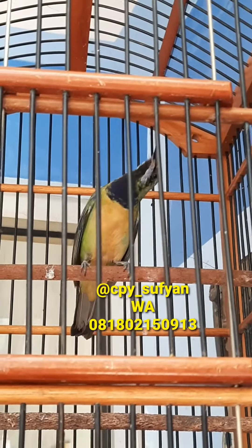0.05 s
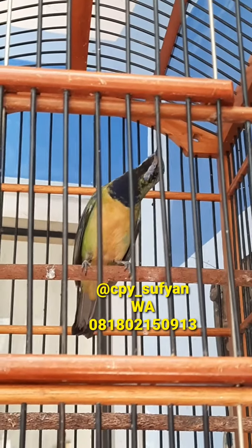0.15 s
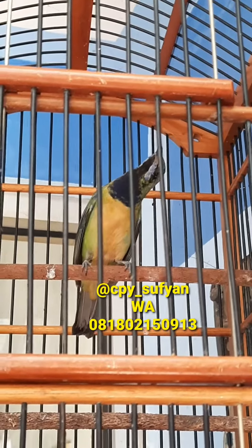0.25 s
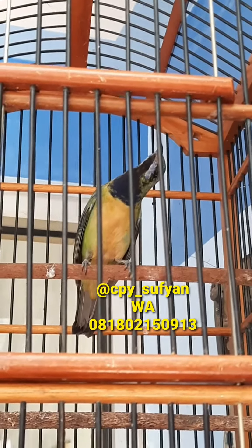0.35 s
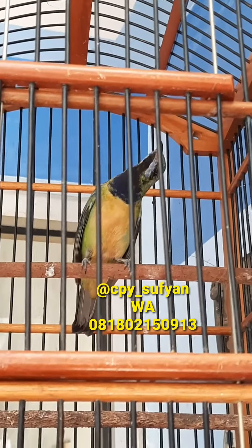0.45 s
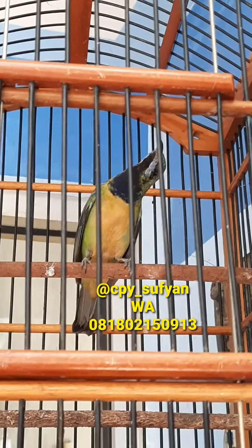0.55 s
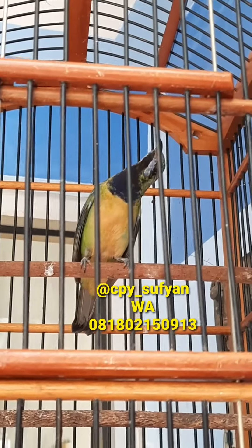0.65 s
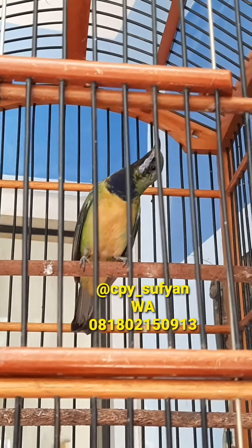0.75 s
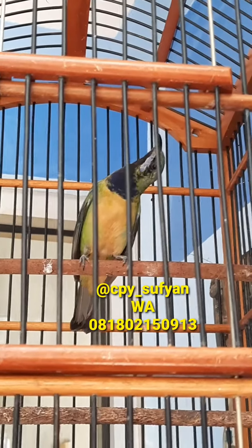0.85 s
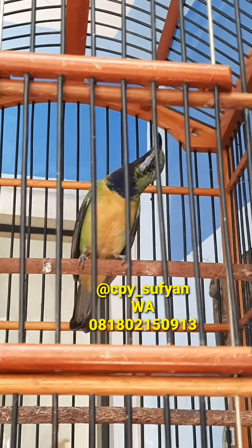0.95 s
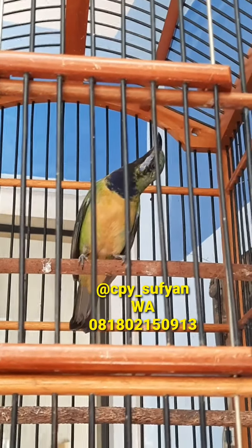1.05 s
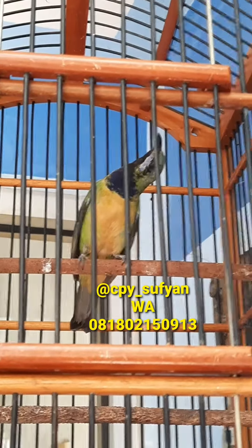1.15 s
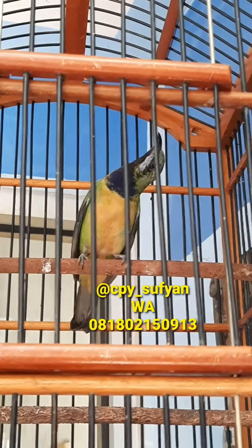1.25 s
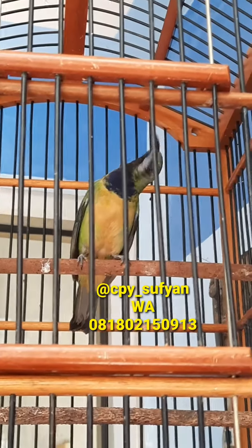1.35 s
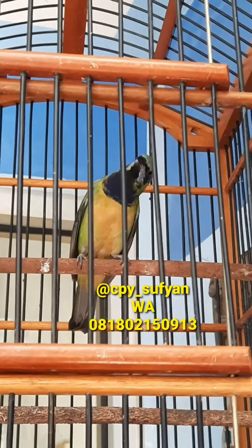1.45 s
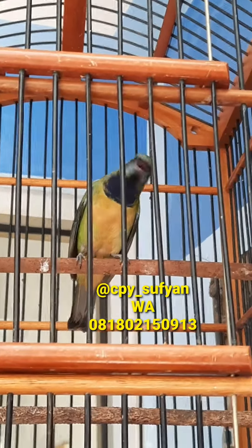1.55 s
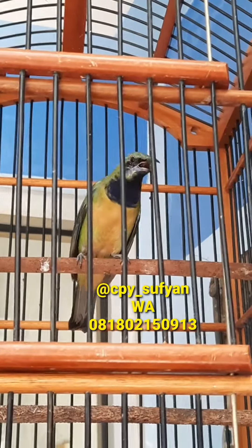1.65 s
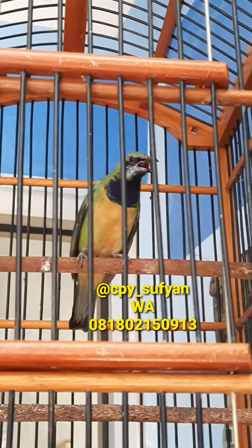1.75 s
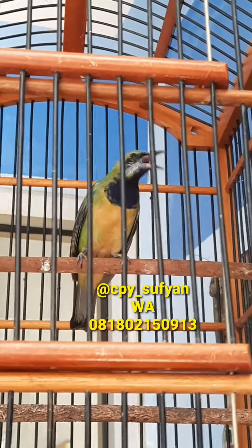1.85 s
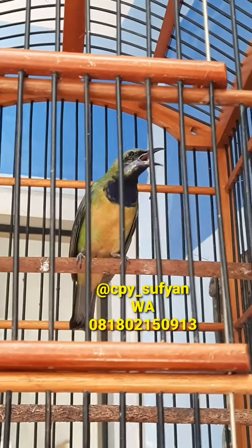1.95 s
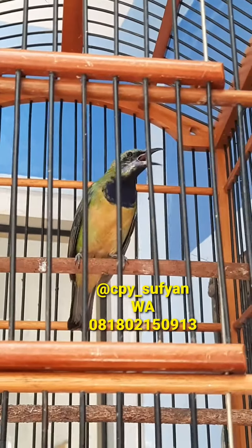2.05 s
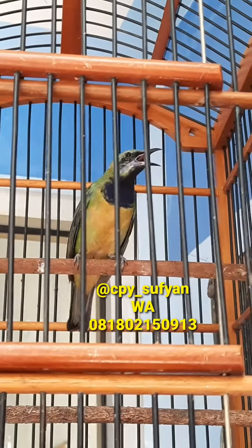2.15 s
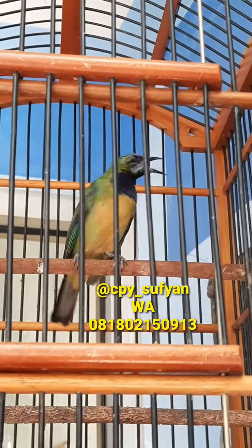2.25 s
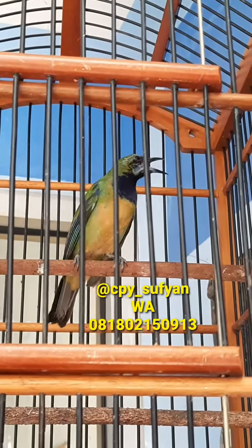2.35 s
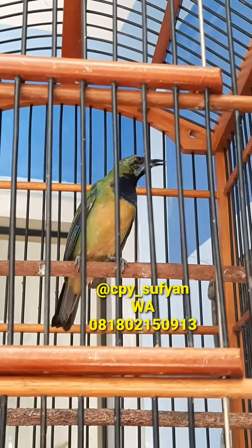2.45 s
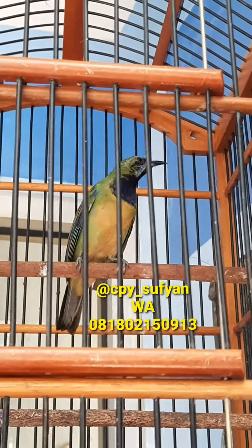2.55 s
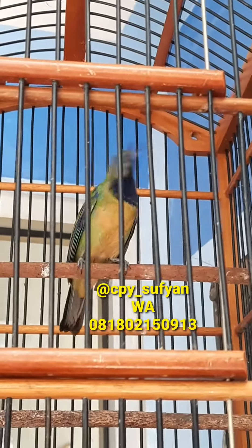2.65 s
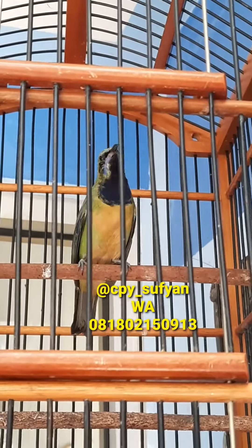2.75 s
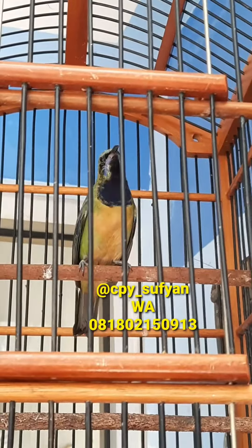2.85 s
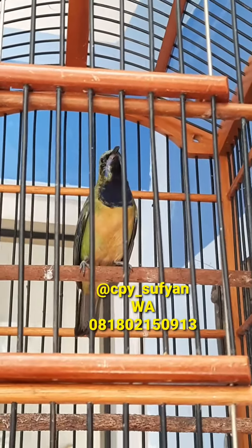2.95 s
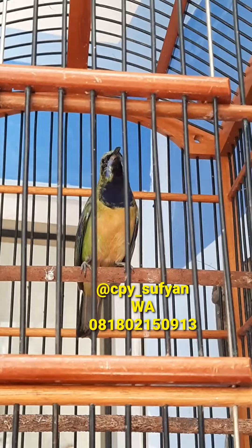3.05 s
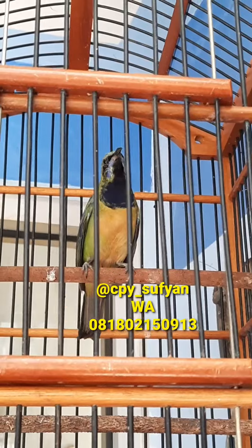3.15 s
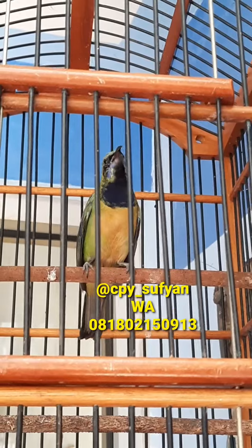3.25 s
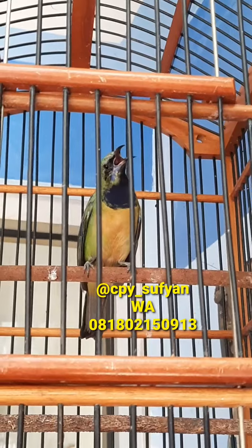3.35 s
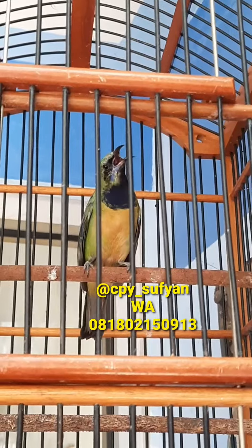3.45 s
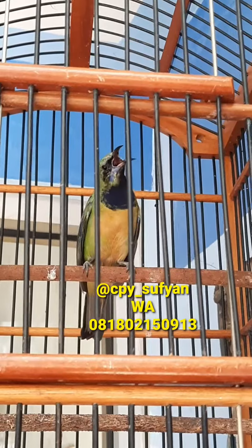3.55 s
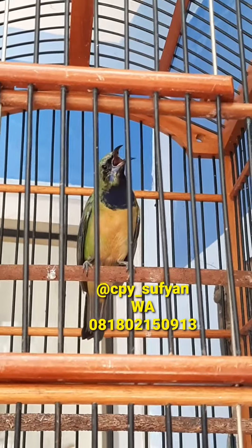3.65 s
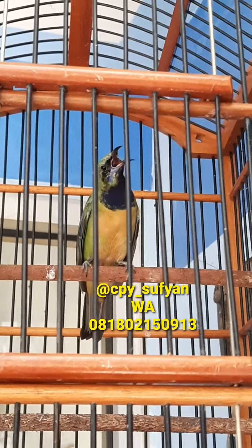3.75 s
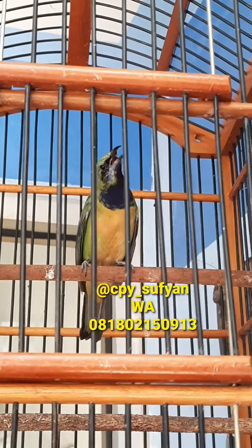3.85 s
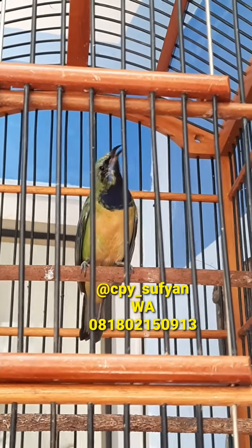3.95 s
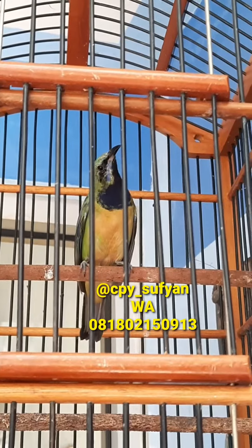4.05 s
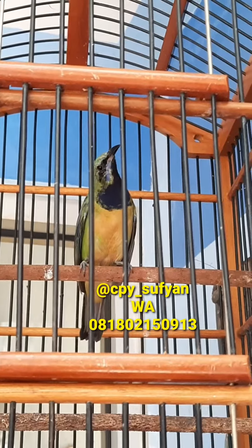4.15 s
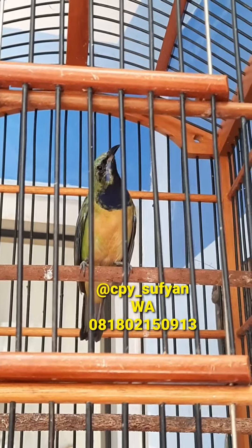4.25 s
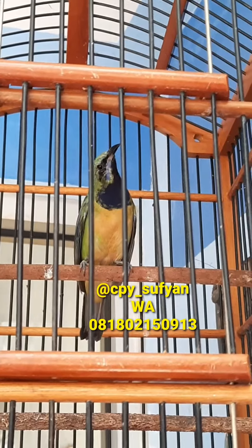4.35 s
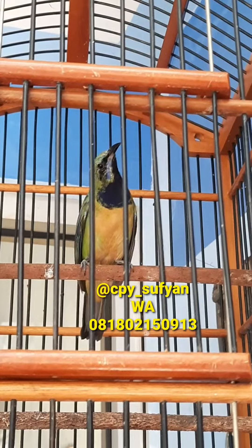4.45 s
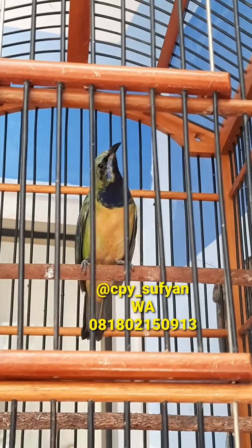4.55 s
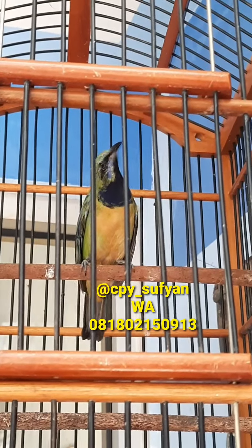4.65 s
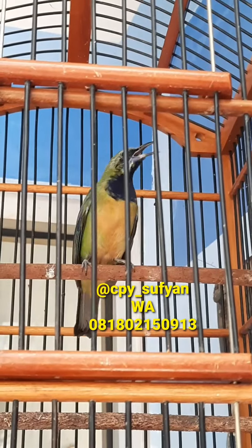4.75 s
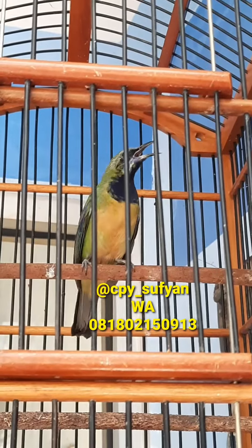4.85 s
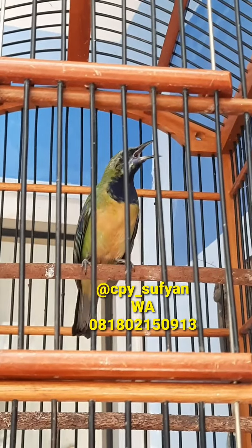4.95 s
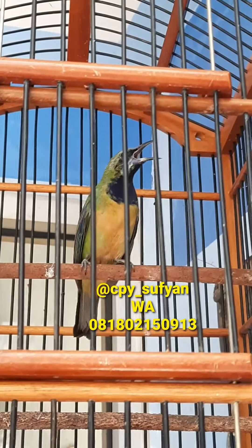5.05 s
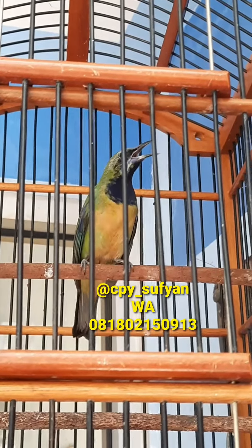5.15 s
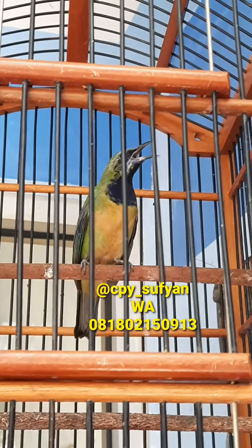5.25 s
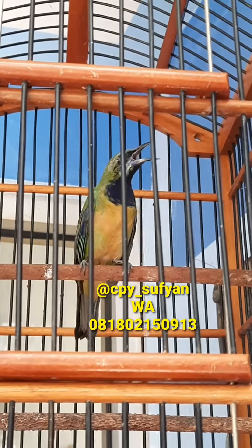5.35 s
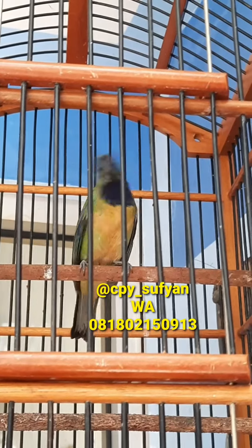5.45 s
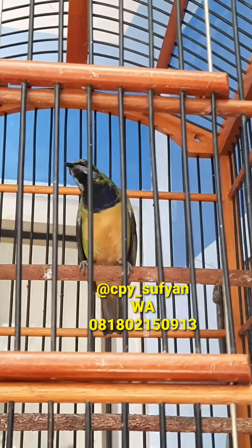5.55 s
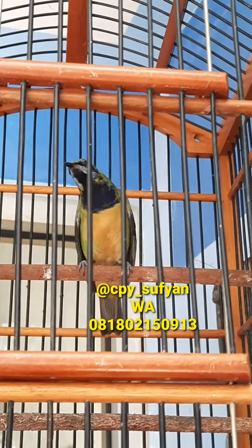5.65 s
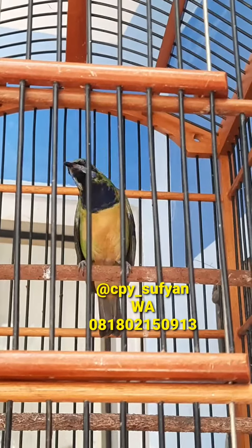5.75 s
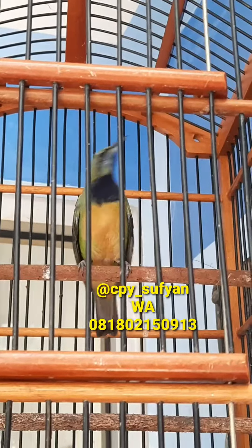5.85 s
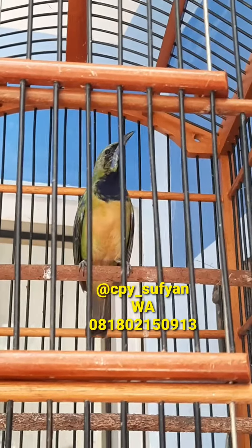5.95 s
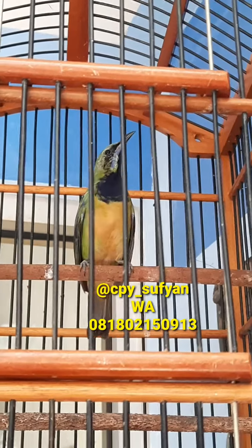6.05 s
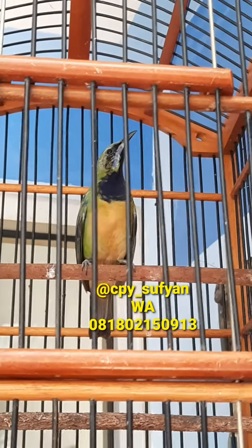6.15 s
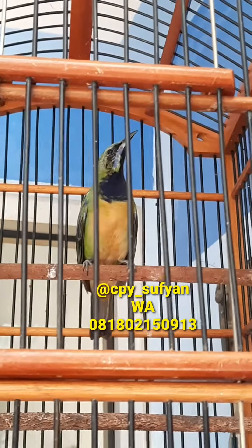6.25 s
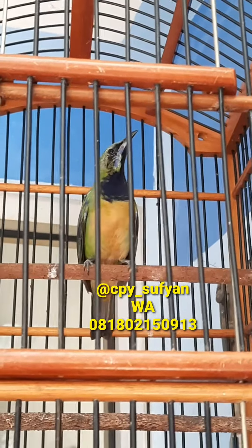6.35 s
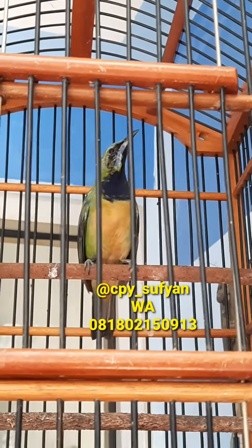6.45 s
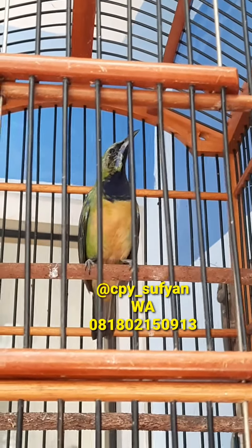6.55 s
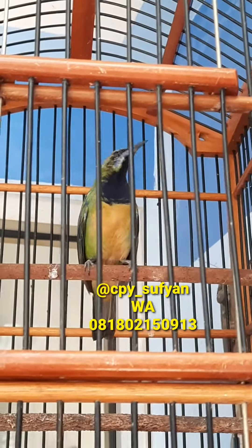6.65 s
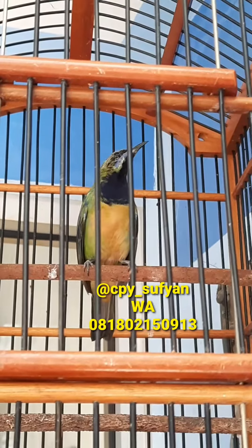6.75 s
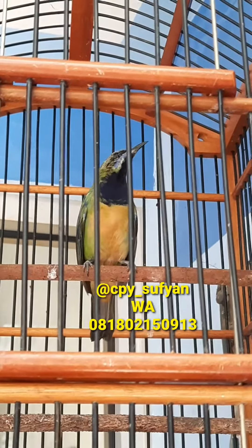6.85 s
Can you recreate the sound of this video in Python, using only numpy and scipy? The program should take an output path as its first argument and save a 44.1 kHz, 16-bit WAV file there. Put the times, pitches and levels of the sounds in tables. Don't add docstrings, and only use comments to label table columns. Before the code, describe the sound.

In a small hard-walled yard, faint brushing and a thin, hoarse far whistle come first. A low motor swells beyond the wall, then a close caged songbird, slightly left, rattles three rapid runs of dry high rasps. During the third, a second bird on the right begins sharp, squealing chacks about five per second, continuing to the end. Close stereo pickup, short bright echoes.

```python
import sys
import numpy as np
from scipy import signal
from scipy.io import wavfile

SR = 44100
rng = np.random.default_rng(int(sys.argv[2]) if len(sys.argv) > 2 else 0)


def generate_wav(sig):
    pcm = np.round(np.clip(np.atleast_2d(sig).T, -1, 1) * 32767).astype(np.int16)
    wavfile.write(sys.argv[1], SR, pcm)


def gain_from_db(level_db):
    decades = np.asarray(level_db, float) / 20
    return 10 ** decades


N = 303849

YARD_T60_S, BARS_T60_S = 0.46, 0.036

RUN_STARTS = [1.62, 3.33, 4.82]
# [t/s, level/dB, length/ms, throat f/Hz]
RASP_NOTES = [(1.624, -17.5, 25, 6000), (1.688, -18.5, 31, 5500), (1.766, -15.5, 30.4, 4860),
              (1.845, -14.5, 31.2, 4960), (1.909, -15, 40.6, 5540), (2.014, -14, 33, 5530),
              (2.094, -15.5, 33.2, 5280), (2.173, -16.5, 33, 5340), (2.244, -16, 40.2, 5500),
              (2.315, -14, 22.7, 5830), (2.374, -19.5, 23.5, 5980), (2.43, -23.5, 24, 5660),
              (3.335, -23.5, 34, 5500), (3.405, -19, 26.5, 6000), (3.475, -18, 40, 5060),
              (3.569, -16.5, 49, 5160), (3.629, -16.5, 40, 5560), (3.717, -15, 30, 5350),
              (3.799, -15, 26.8, 5600), (3.86, -18, 30, 6000), (4.83, -23, 18.6, 5650),
              (4.894, -23, 30, 6540), (4.972, -15.5, 33, 4970), (5.036, -16.5, 30.4, 5600),
              (5.106, -17.5, 28.6, 6000), (5.179, -19.5, 31, 5500), (5.262, -19.5, 35, 4700),
              (5.332, -19.5, 43, 5700), (5.397, -17.5, 37, 5600)]
LOW_DB, LOW_FADE_DB_PER_S = -10, 11
TOP_DB, TOP_GROWTH = -4.5, 0.21


def rasps():
    out = np.zeros((2, N + SR))
    for s, db, ms, hz in RASP_NOTES:
        into_run_s = min(s - start for start in RUN_STARTS if start < s)
        low_db = LOW_DB - LOW_FADE_DB_PER_S * into_run_s
        top_db = TOP_DB + TOP_GROWTH * (db + 15)
        size = int(1.7 * ms * SR / 1000)
        opening = np.linspace(-.5, .5, size)
        centre_hz = min(hz, 5950)
        pitch_hz = 680 * (1 + .1 * rng.standard_normal() + 0.1567 * opening)
        partials = np.arange(2, 14)[:, None] * pitch_hz
        throat = hump(partials, centre_hz * (1 + 0.34 * opening), 2300)
        throat += gain_from_db(low_db + 5) * hump(partials, 2900, 2400)
        partials_db = 20 * np.log10(throat) - 6 * (partials < 1550) - 5 * (partials > 7600)
        voiced = strands(partials, partials_db, fray_db=4.0, fray_hz=600, wobble_hz=150)
        air = slaps(size, rate_hz=1300, jitter=.5, uneven_db=-5.5, breath=1.5)
        breath = unit(resonate(air, centre_hz, 1670) - gain_from_db(low_db) * resonate(air, 3800, 2900))
        top = gain_from_db(top_db - 8.5) * unit(resonate(air, 17400, 2500) - resonate(air, 11500, 1300))
        note = gain_from_db(db - 8) * swell(size, rise=1.2, fall=1.3) * (voiced + gain_from_db(1.5) * breath - top)
        at = int((s - .25 * ms / 1000) * SR)
        out[:, at:at + size + 1323] += in_cage(note, lag=-4.5, pan_db=4.0, bars_db=2.5)
    return signal.sosfilt(signal.butter(2, 1450, "high", fs=SR, output="sos"), out)


# [t/s, level/dB, length/ms, squeal f/Hz, low resonance level/dB]
CHACK_NOTES = [
    (4.898, -9, 18.3, 6950, -42),
    (5.117, -16, 22, 7260, -32),
    (5.341, -9, 13, 7430, -22.5),
    (5.548, -12, 25.6, 7695, -19.5),
    (5.766, -10.5, 23.1, 7100, -21.5),
    (5.977, -15, 17.2, 7190, -18.5),
    (6.208, -12, 16, 7326, -18.5),
    (6.407, -12, 12.5, 7630, -14.5),
    (6.623, -12, 17.3, 7520, -15),
    (6.836, -15, 16.8, 7510, -13.5),
]
MID_DB, MID_SQUEEZE = -11, 0.51


def chacks():
    out = np.zeros((2, N + SR))
    for s, db, ms, hz, low_db in CHACK_NOTES:
        mid_db = MID_DB - MID_SQUEEZE * (db + 13)
        size = int(2.1 * ms * SR / 1000)
        share = np.linspace(0, 1, size)
        high_hz = hz * np.array([[1], [1.13], [1.28], [1.42], [1.8], [1.93]])
        high_hz = high_hz * (1 + 0.134 * np.exp(-share / 0.069))
        high_db = np.array([[0], [-5], [-14], [-22], [-24], [-22]])
        squeal = strands(high_hz, high_db, fray_db=2.5, fray_hz=700, wobble_hz=236)
        mid_hz = hz * np.array([[.84], [.72]]) * (1.04 - .1 * share)
        mid = strands(mid_hz, np.array([[0], [-3]]), fray_db=5.0, fray_hz=800, wobble_hz=350)
        low_hz = hz * np.array([[.42], [.31], [.2]]) * (1.1 - 0.38 * share)
        low = strands(low_hz, np.array([[0], [-1], [-9]]), fray_db=5.5, fray_hz=426, wobble_hz=211)
        air = slaps(size, rate_hz=920, jitter=0.35, uneven_db=9.0, breath=0.99)
        stutter = gain_from_db(2.7 * quiver((1, size), 350)[0])
        hiss = gain_from_db(-12) * unit(resonate(air, hz, 3500)) + gain_from_db(-18) * unit(resonate(air, 13600, 2500))
        note = swell(size, rise=1.0, fall=1.78) * (stutter * squeal + hiss)
        note += swell(size, rise=1.3, fall=2.0) * gain_from_db(mid_db + 7) * mid
        note += swell(size, rise=1.9, fall=1.48) * gain_from_db(low_db + 6.5) * low
        note[:300] += gain_from_db(4) * ping()
        puff = unit(resonate(resonate(air, 600, 900), 600, 900))
        note += gain_from_db(low_db - 8) * swell(size, rise=2.4, fall=3.0) * puff
        at = int((s - .005) * SR)
        out[:, at:at + size + 1323] += in_cage(gain_from_db(db - 8) * note, lag=13, pan_db=-11, bars_db=-9)
    return out


def ping():
    click = signal.unit_impulse(300)
    return resonate(resonate(click, 9000, 900), 8400, 900) + gain_from_db(-22) * resonate(click, 13500, 2500)


# [t/s, peak level/dB]
BEAK_TICKS = [(5.7542, -32), (5.9585, -25), (6.1774, -29), (6.388, -35), (6.6075, -24), (6.822, -31)]


def ticks():
    out = np.zeros((2, N + SR))
    for s, db in BEAK_TICKS:
        at = int(s * SR)
        out[:, at:at + 1623] += in_cage(gain_from_db(db + 29) * ping(), lag=13, pan_db=-9, bars_db=-15)
    return out


# [t/s, length/s, top f/Hz, level/dB]
ARCHED_WHISTLES = [
    (0.079, 0.23, 6300, -34.5),
    (1.449, 0.17, 6450, -34.5),
    (2.686, 0.24, 6090, -43),
    (4.016, 0.1244, 6280, -37.5),
    (6.747, 0.182, 5920, -40.5),
]
# [t/s, length/s, first f/Hz, last f/Hz, level/dB]
STRAIGHT_WHISTLES = [(0.614, 0.17, 4605, 4780, -44), (.69, .16, 6760, 7300, -48),
                     (1.02, 0.12, 6670, 5600, -51), (1.376, 0.17, 5500, 5480, -40),
                     (2.294, 0.17, 6300, 6180, -29), (3.867, 0.08, 6760, 6760, -39),
                     (2.827, 0.097, 5660, 4870, -42.5), (3.037, .14, 5730, 4340, -49.5),
                     (3.231, 0.094, 6600, 6770, -56), (4.078, .1, 7000, 6930, -41),
                     (4.13, 0.11, 5950, 5650, -35.5), (6.506, 0.099, 4746, 4820, -40)]
ARCH_DROP, ARCH_TOP_AT = .075, 0.49


def whistles():
    out = np.zeros((2, N + SR))
    flutter = [wander(150) for k in range(4)]
    fray = [wander(60) for k in range(4)]
    share = np.linspace(0, 1, 33)
    arch = 1 - ARCH_DROP * ((share - ARCH_TOP_AT) / (1 - ARCH_TOP_AT)) ** 2
    notes = [(s, length, hz * arch, db, 1.1) for s, length, hz, db in ARCHED_WHISTLES]
    for s, length, first, last, db in STRAIGHT_WHISTLES:
        notes.append((s, length, last + (first - last) * (1 - share) ** 1.5, db, .55))
    for s, length, hz, db, hoarse in notes:
        span = slice(int(s * SR), min(int((s + length) * SR), N))
        shape = swell(int(length * SR) + 2, rise=0.47, fall=0.92)
        t = np.arange(N)[span] / SR - s
        for k in range(4):
            echo = k // 2
            pitch_hz = np.interp(t - 0.01954 * echo, share * length, hz)
            shake = 1 + hoarse * (.008 + .02 * echo) * flutter[k][span]
            turns = np.cumsum(pitch_hz * shake) / SR
            gain = gain_from_db(db - 1.2 * echo + 4.1 * hoarse * fray[k][span])
            out[k % 2, span] += shape[:len(t)] * gain * np.sin(2 * np.pi * turns)
    return out


# [t/s, level/dB, length/ms, f/Hz, width/Hz]
HOARSE_NOTES = [(.001, -40, 310, 3760, 2600), (.05, -48, 113, 630, 111.1), (0.553, -38, 82, 1980, 378),
                (.915, -38, 80, 2050, 540), (1.122, -43.5, 61, 1050, 486), (1.24, -42.5, 46, 3040, 540),
                (1.39, -40.5, 71, 6500, 1944), (1.471, -39.5, 120, 3940, 1620),
                (1.659, -44, 140, 1150, 503), (2.441, -40, 30, 1050, 450), (2.63, -44.5, 110, 5800, 2160),
                (4.1, -54, 120, 2440, 300), (4.561, -49.5, 240, 5200, 900), (4.57, -51, 150, 6700, 900),
                (4.77, -51, 69, 2510, 200), (5.123, -39, 14, 388.9, 555.6), (5.344, -38.5, 11, 590, 800)]


def hoarse_calls():
    out = np.zeros((2, N + SR))
    for s, db, ms, hz, width_hz in HOARSE_NOTES:
        size = int(ms * SR / 1000)
        air = rng.standard_normal((2, 16000))[:, :size]
        breath = unit(resonate(resonate(air, hz, width_hz), hz, width_hz))
        at = int(s * SR)
        out[:, at:at + size] += gain_from_db(db) * swell(size, rise=0.21, fall=0.27) * breath
    return out


# [low f/Hz, high f/Hz]
GROUND_BANDS = [
    (700, 1500),
    (1500, 3200),
    (3200, 6800),
    (7200, 14500),
]
# [t/s, length/s, level/dB, brightness/dB per band step]
BRUSH_STROKES = [(0, 0.43, -41, -2.5), (0.55, .2, -49, -9.5), (0.703, 0.42, -50, 2),
                 (0.882, 0.28, -42, -5.5), (1.132, 0.2, -41.5, -0.5), (1.295, 0.74, -41.5, -2),
                 (1.502, 0.9, -39.5, -0.5), (2.395, 0.51, -45.5, -3), (2.81, 0.26, -47.5, -0.5),
                 (3.06, 0.21, -49, 2), (3.904, 0.53, -49.5, 5.5), (4.415, 0.085, -52, -1.0),
                 (4.55, 0.27, -51.5, 1), (4.81, 0.46, -43, -2), (5.493, 0.51, -44.5, 2),
                 (6.206, 2.6, -48.5, 3)]
STROKE_COLOUR = [-16, -3, -1.5, -9.5]
SHUFFLE = [-58.5, -54.5, -57.5, -72]


def rustle():
    power = np.ones((4, N + 2 * SR)) * gain_from_db(np.array(SHUFFLE)[:, None]) ** 2
    for s, length, db, bright_db in BRUSH_STROKES:
        colour = gain_from_db(db + np.array(STROKE_COLOUR) + bright_db * (np.arange(4) - 2))[:, None]
        at, size = int(s * SR), int(length * SR)
        power[:, at:at + size] += (colour * swell(size, rise=0.36, fall=1.47)) ** 2
    grain = gain_from_db(1.12 * wander(110))
    out = np.zeros((2, N))
    for p, band in zip(power, GROUND_BANDS):
        out += np.sqrt(p[:N]) * gain_from_db(2.9 * wander(2.6)) * grain * stereo_band(*band)
    return out


# [t/s, level/dB]
MOTOR_LEVEL = [(0.0, -40), (0.11, -62), (0.55, -45), (0.94, -53), (1.21, -45), (1.34, -59), (1.4, -35),
               (1.5, -31.5), (1.98, -36.5), (4.39, -37.5), (4.8, -35), (5.12, -40), (6.43, -40.5),
               (6.68, -37.5), (6.89, -40.5)]
# [f/Hz, level/dB per Hz]
MOTOR_SPECTRUM = [(18, -45), (30, -18), (64, 1), (82, -0.5), (129, -4), (200, -22), (260, -51), (440, -120)]


def rumble():
    s, db = np.transpose(MOTOR_LEVEL)
    turns = np.cumsum(80 * (1 + 0.0318 * wander(3.22))) / SR
    firing = np.sin(2 * np.pi * turns) * gain_from_db(-1.5 + 1.0 * wander(14.0))
    body = coloured(MOTOR_SPECTRUM, np.geomspace(45, 200, 6), patchy_db=0.0)
    return gain_from_db(np.interp(np.arange(N) / SR, s, db) - 4.5) * (body + firing)


# [f/Hz, width/Hz, level/dB]
TRAFFIC_MODES = [
    (314, 39, -54.5),
    (367, 39, -58),
    (650, 140, -64),
]


def drone():
    shared, own = rng.standard_normal(N), rng.standard_normal((2, N))
    s, motor_db = np.transpose(MOTOR_LEVEL)
    load_db = 0.31 * np.interp(np.arange(N) / SR, s, np.maximum(motor_db, -50) + 44.5)
    out = np.zeros((2, N))
    for hz, width_hz, db in TRAFFIC_MODES:
        boom = unit(resonate(resonate(shared + 0.5 * own, hz, width_hz), hz, width_hz))
        out += gain_from_db(db + load_db + 2.9 * wander(1.27)) * boom
    return out


# [f/Hz, level/dB per Hz]
AIR_SPECTRUM = [(18, -32), (30, -5.5), (83, -8.5), (237, -23), (324, -0.5), (443, -15), (606, -16),
                (1820, -30.5), (3320, -53), (3880, -25.5), (7460, -36), (14000, -29.5), (15500, -64)]


def open_air():
    return gain_from_db(-51) * coloured(AIR_SPECTRUM, np.geomspace(75, 15500, 15), patchy_db=3.5)


def slaps(size, rate_hz, jitter, uneven_db, breath):
    chance = rng.standard_normal((3, 4096))
    at = np.cumsum(SR / rate_hz * np.exp(jitter * chance[0])).astype(int)
    out = breath * chance[2, :size] * np.sqrt(rate_hz / SR)
    out[at[at < size]] += gain_from_db(uneven_db * chance[1, at < size])
    return unit(out)


def strands(hz, db, fray_db, fray_hz, wobble_hz):
    turns = np.cumsum(hz + wobble_hz * quiver(hz.shape, 118.4), axis=1) / SR + rng.random((len(hz), 1))
    gain = gain_from_db(db + fray_db * quiver(hz.shape, fray_hz))
    return unit(np.sum(gain * np.sin(2 * np.pi * turns), axis=0))


def quiver(shape, rate_hz):
    r = np.exp(-2 * np.pi * rate_hz / SR)
    chance = rng.standard_normal((shape[0], 4600))
    return unit(signal.lfilter([1], [1, -2 * r, r * r], chance)[:, 500:500 + shape[1]])


def wander(rate_hz):
    r = np.exp(-32 * np.pi * rate_hz / SR)
    slow = signal.lfilter([1], [1, -2 * r, r * r], rng.standard_normal(N // 16 + 3002))[3000:]
    return np.interp(np.arange(N) / 16, np.arange(len(slow)), unit(slow))


def swell(size, rise, fall):
    share = np.linspace(0, 1, size)
    shape = share ** rise * (1 - share) ** fall
    return shape / shape.max()


def unit(x):
    return x / np.sqrt(np.mean(x ** 2) + 1e-20)


def resonate(x, hz, width_hz):
    r = np.exp(-np.pi * width_hz / SR)
    poles = [1, -2 * r * np.cos(2 * np.pi * hz / SR), r * r]
    return signal.lfilter(np.array([1, 0, -1]) * (1 - r * r) / 2, poles, x)


def hump(hz, centre_hz, width_hz):
    return 1 / (1 + (2 * (hz - centre_hz) / width_hz) ** 2)


def on_log_hz(points, hz):
    return np.interp(np.log(hz), np.log(np.array(points)[:, 0]), np.array(points)[:, 1])


# [f/Hz, correlation]
EAR_LIKENESS = [(60, 0.91), (180, .85), (550, 0.54), (1300, -0.2), (2000, -0.12), (5000, 0.02)]


def stereo_band(low_hz, high_hz):
    sos = signal.butter(2, [low_hz, high_hz], "band", fs=SR, output="sos")
    mid, side = unit(signal.sosfilt(sos, rng.standard_normal((2, N))))
    alike = np.clip(on_log_hz(EAR_LIKENESS, np.sqrt(low_hz * high_hz)), -1, 1)
    return (np.sqrt(1 + alike) * mid + np.sqrt(1 - alike) * side * np.array([[1], [-1]])) / np.sqrt(2)


def coloured(spectrum, edges_hz, patchy_db):
    out = np.zeros((2, N))
    for a, b in zip(edges_hz, edges_hz[1:]):
        gain = gain_from_db(on_log_hz(spectrum, np.sqrt(a * b)) + patchy_db * wander(4.1))
        out += gain * np.sqrt(b - a) * stereo_band(a, b)
    return unit(out)


def tail(t60, length, size):
    age = np.arange(size) / SR
    cloud = rng.standard_normal((2, size)) * gain_from_db(-60 * age / t60) * (age < length)
    return unit(cloud) / np.sqrt(size)


def in_cage(note, lag, pan_db, bars_db):
    direct = np.pad(note, (16, 1307))
    direct = np.array([np.roll(direct, lag), direct]) * gain_from_db(np.array([[pan_db], [-pan_db]]) / 2)
    return direct + gain_from_db(bars_db) * signal.fftconvolve(note[None], tail(BARS_T60_S, .03, size=1324), axes=1)


def yard(x, wet_db, t60):
    echo = signal.lfilter([1], [1, -.35], tail(t60, .5, size=SR // 2))
    echo = np.pad(echo, ((0, 0), (350, 0)))
    return x[:, :N] + gain_from_db(wet_db) * signal.fftconvolve(x.mean(axis=0)[None], echo, axes=1)[:, :N]


def scene():
    near = yard(rasps(), wet_db=-6.5, t60=YARD_T60_S) + yard(chacks() + ticks(), wet_db=-11.0, t60=0.25)
    far = yard(whistles() + hoarse_calls(), wet_db=-2.0, t60=YARD_T60_S)
    return near + far + rustle() + rumble() + drone() + open_air()


# [t/s, length/s]
LOW_MID_GAPS = [(1.862, .025), (1.912, .04), (2.12, 0.032), (2.19, .025), (2.249, 0.13), (2.385, .045),
                (3.453, .08), (3.59, .09), (3.787, 0.13), (4.949, .04), (5.033, .06), (5.17, .07),
                (5.263, .06), (5.393, .09), (5.783, 0.037)]
GAP_LOW_HZ, GAP_HIGH_HZ, WIDEN_HZ_PER_S = 580, 1150, 3900


def thin_out(x):
    hz, s, frames = signal.stft(x, SR, nperseg=1024)
    loud = np.sqrt(np.mean(np.abs(frames[:, (hz > 3000) & (hz < 8000)]) ** 2, axis=(0, 1)))
    masked = ((hz > 480) & (hz < 1600))[:, None] & (np.abs(frames) < gain_from_db(-25) * loud)
    frames[masked] *= gain_from_db(-30)
    holes = np.repeat(np.repeat(rng.random((172, len(s) // 4 + 1)) < .035, 3, axis=0), 4, axis=1)
    frames[:, holes[:len(hz), :len(s)] & (hz > 7500)[:, None]] *= gain_from_db(-20)
    spared = np.repeat(np.repeat(rng.random((129, len(s) // 2 + 1)) < .13, 4, axis=0), 2, axis=1)
    for start, length in LOW_MID_GAPS:
        band = (hz > GAP_LOW_HZ) & (hz < GAP_HIGH_HZ + WIDEN_HZ_PER_S * length)
        cells = band[:, None] & (s > start) & (s < start + length)
        frames[:, cells & ~spared[:len(hz), :len(s)]] *= gain_from_db(-30)
    treble = np.clip((hz[:, None] - 10500) / 1500, 0, 1)
    frames *= gain_from_db(np.array([2.5, -2.5])[:, None, None] * treble)
    return signal.istft(frames, SR, nperseg=1024)[1][:, :N]


def band_limit(x):
    return signal.sosfilt(signal.butter(12, 15790, fs=SR, output="sos"), x)


def record(dry):
    limited = np.clip(1.5 * np.tanh(dry / 1.5), -.92, .92)
    top_cut = signal.cheby2(10, 45, 1.03 * 14900, fs=SR, output="sos")
    mix = signal.sosfilt(top_cut, thin_out(limited))
    return band_limit(mix)


dry = scene()
out = record(dry)
generate_wav(out)
```